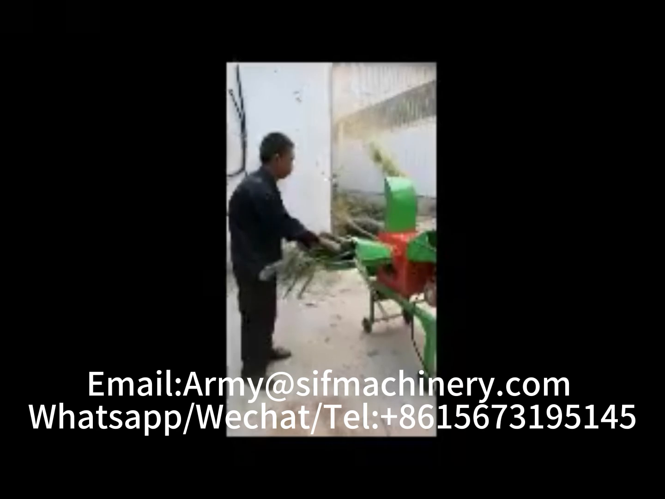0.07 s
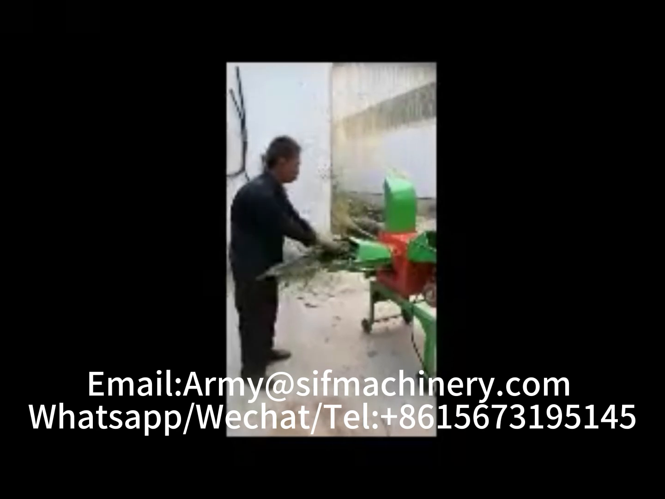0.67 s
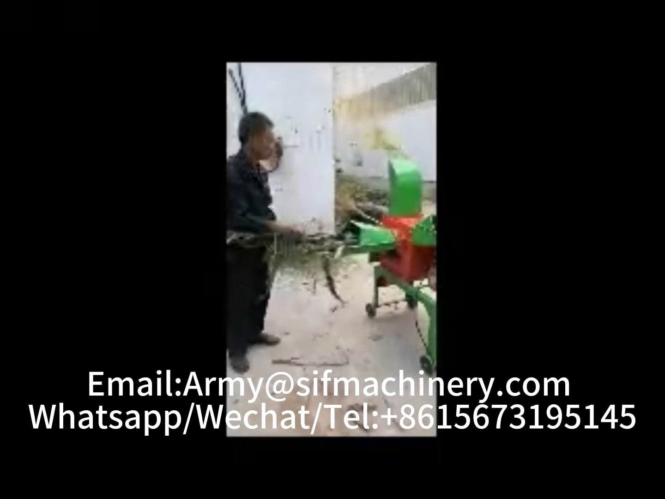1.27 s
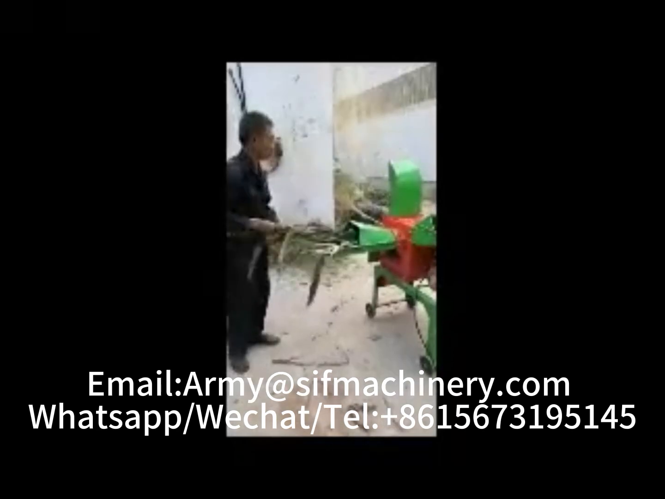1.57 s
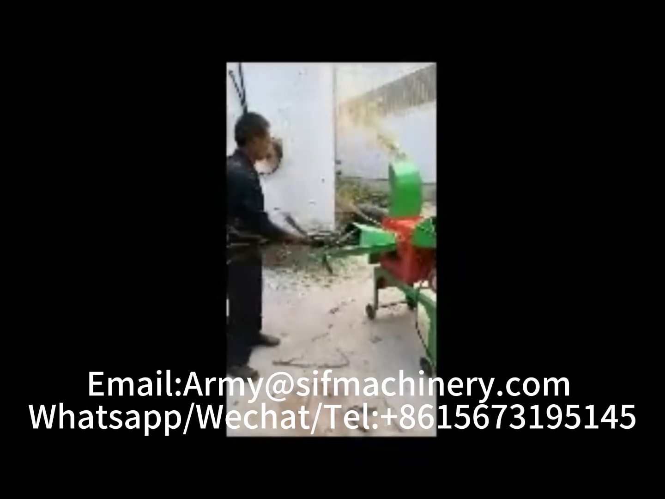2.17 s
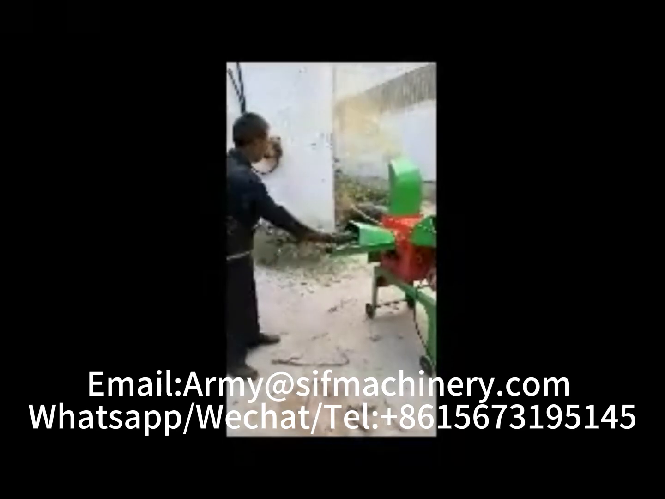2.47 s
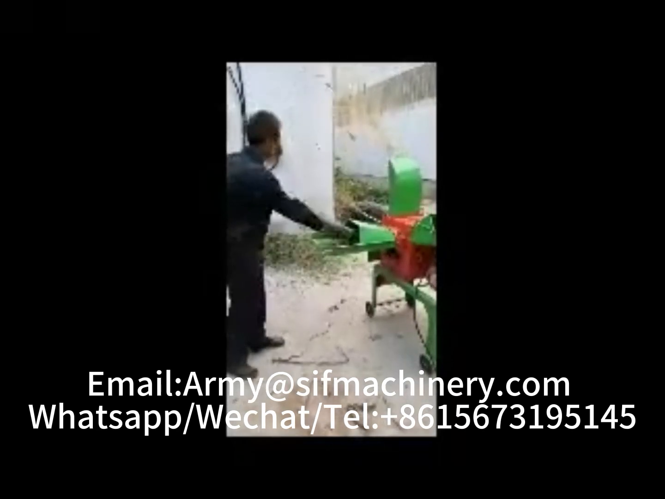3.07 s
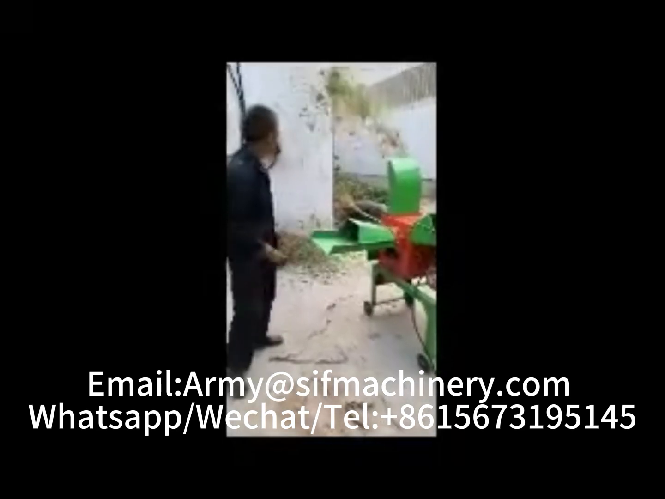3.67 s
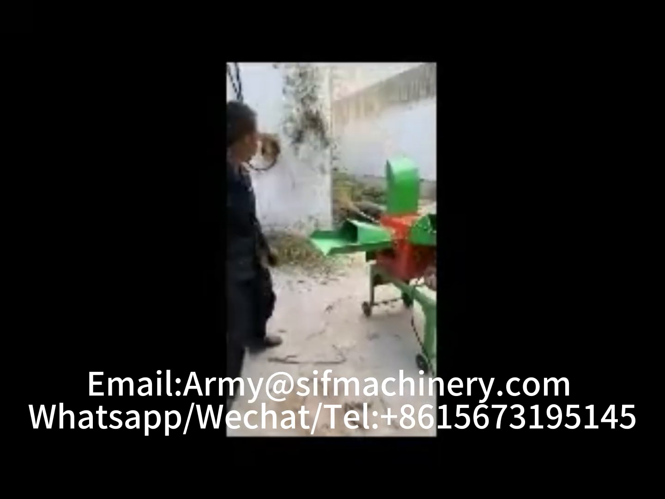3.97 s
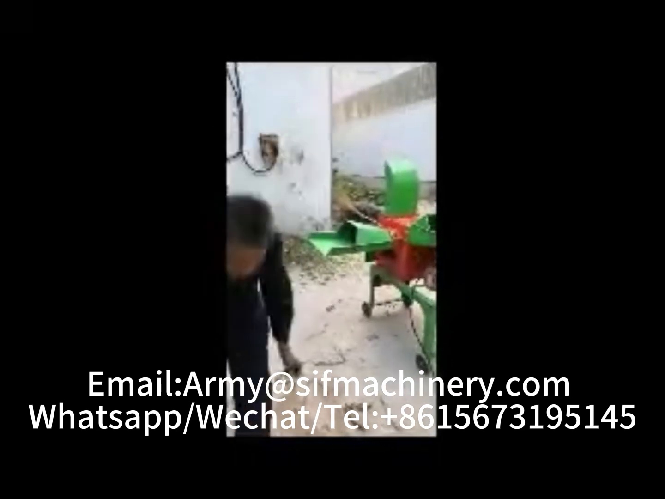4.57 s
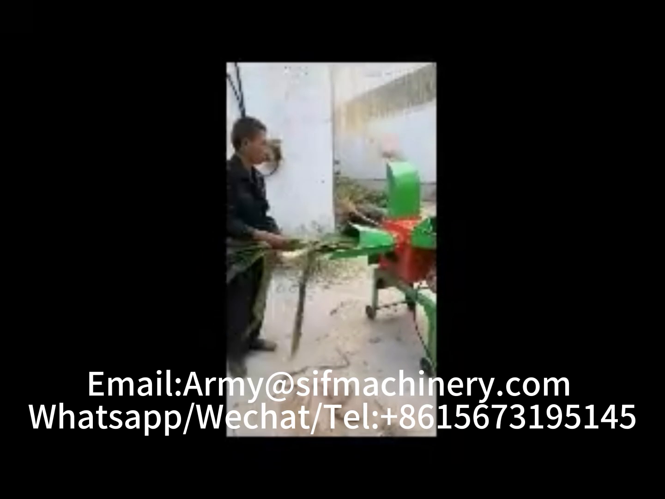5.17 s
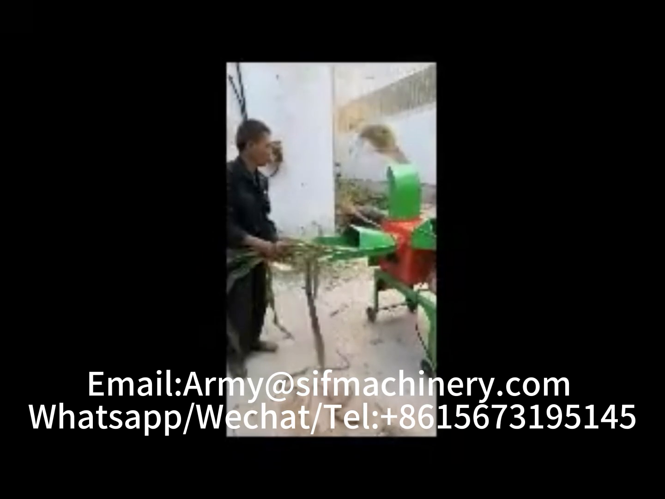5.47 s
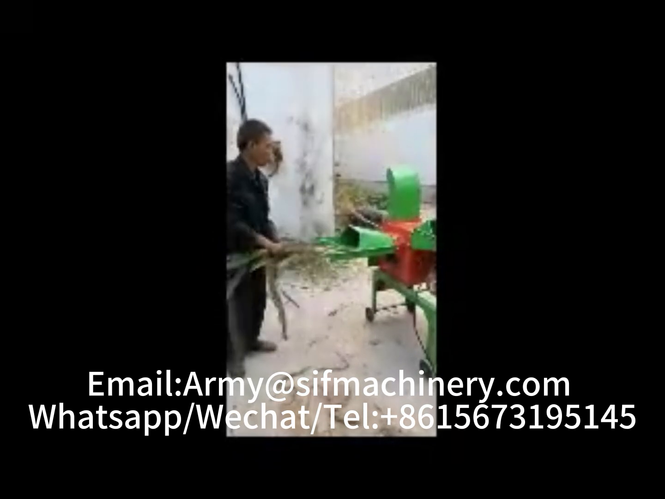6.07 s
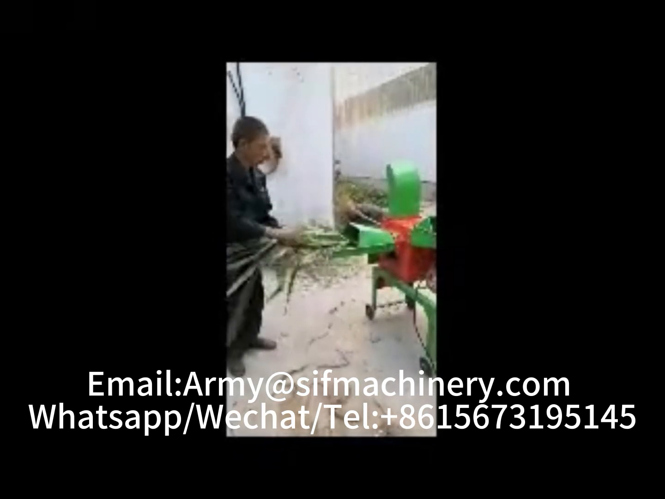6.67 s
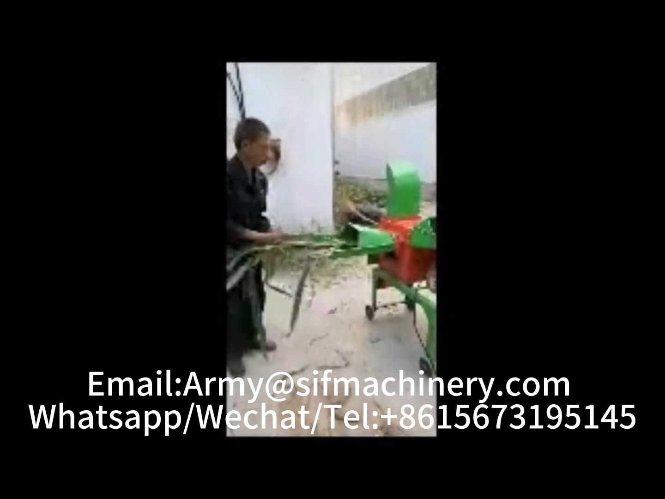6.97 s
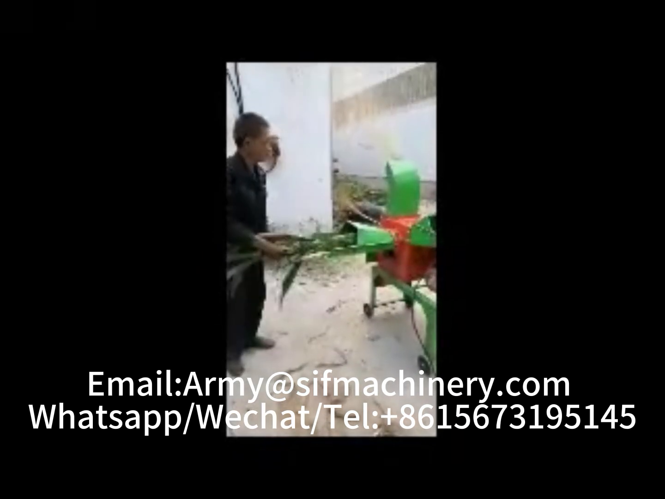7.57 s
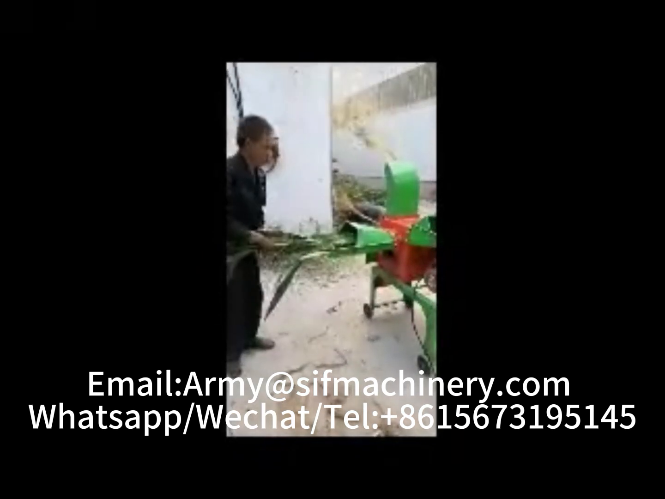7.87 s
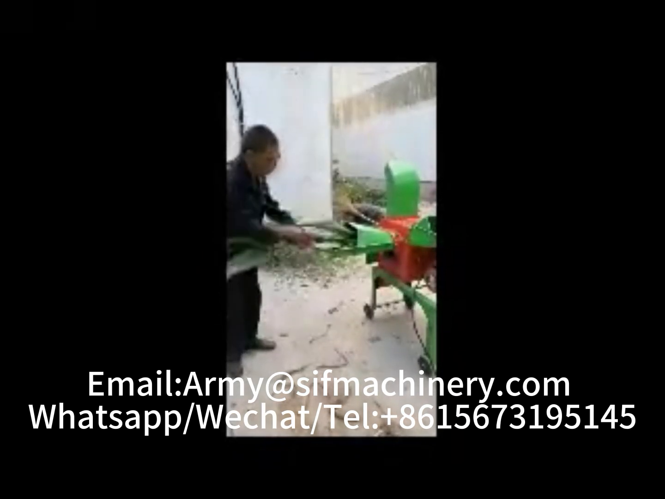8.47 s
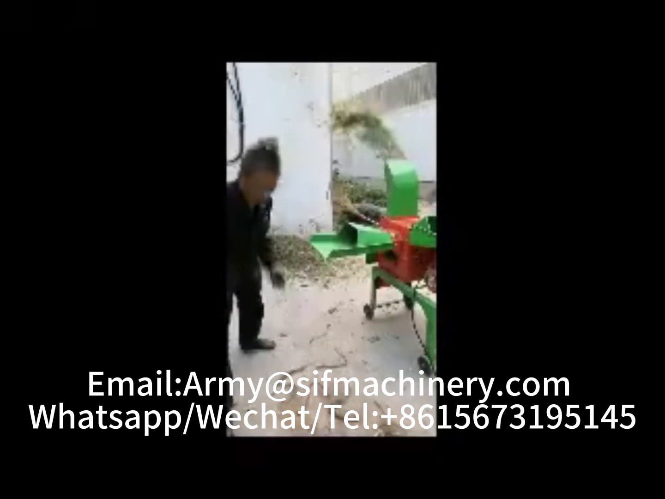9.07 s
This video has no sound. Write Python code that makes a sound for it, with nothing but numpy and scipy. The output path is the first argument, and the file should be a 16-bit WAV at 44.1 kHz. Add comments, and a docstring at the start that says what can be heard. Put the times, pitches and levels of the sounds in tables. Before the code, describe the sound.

A chopping machine runs with a throbbing hum and rattling roar, tearing through bundles of stalks with scrapes and snaps.

```python
"""Chaff cutter in a yard

A belt-driven chaff cutter runs in a walled yard, a little to the right, as bundles of stalks go in.
Its three-knife rotor hums, throbs against the feed drive and blows a rattling roar. Each bundle slows
the rotor and drowns the hum in harsh shredding. Stalks squeal along the sheet-metal chute and a few
snap; there are two dull bumps, and the labouring drive gives a thin whine."""
import sys
import numpy as np
from scipy import signal
from scipy.fft import rfft, irfft, next_fast_len
from scipy.io import wavfile
from scipy.ndimage import uniform_filter1d

SR = 44100
rng = np.random.default_rng(int(sys.argv[2]) if len(sys.argv) > 2 else 0)


def persist_wave(psi):
    """Save psi, clipped to +-1, as 16-bit WAV."""
    counts = np.round(np.clip(psi, -1, 1) * 32767).astype(np.int16)
    wavfile.write(sys.argv[1], SR, np.atleast_2d(counts).T)


N = 411012
T = np.arange(N) / SR
HZ = np.fft.rfftfreq(1024, 1 / SR)


def gain_of(db):
    return 10 ** (np.asarray(db) / 20)


def unit_level(sound):
    return sound / np.sqrt(np.mean(sound ** 2) + 1e-20)


def over_time(points):
    """Joins (time_s, value) points into a value for every sample."""
    return np.interp(T, *np.transpose(points))


def over_pitch(points):
    """Joins (pitch_hz, value) points into a value for every pitch in HZ."""
    hz, value = np.transpose(points)
    return np.interp(np.log(HZ + 1), np.log(hz + 1), value)


def resonance(hz, width_hz):
    """A tone colour with one narrow peak, in dB."""
    return -20 * np.log10(1 + ((HZ - hz) / width_hz) ** 2)


def wander(rate_hz):
    """A smooth random drift, about 1 in size."""
    hz = np.fft.rfftfreq(4096, T[-1] / 4096)
    drift = irfft(rfft(rng.standard_normal(4096)) * np.exp(-(hz / rate_hz) ** 2))
    return np.interp(T, np.linspace(0, T[-1], 4096), unit_level(drift))


def add(mix, start_s, sound):
    part = mix[..., max(round(start_s * SR), 0):][..., :sound.shape[-1]]
    part += sound[..., :part.shape[-1]]


# How alike the left and right sides sound: pitch_hz, likeness (0 to 1)
STEREO_LIKENESS = [(200, 0.82), (330, 0.7), (550, 0.053), (1200, 0.48), (2500, 0.29), (9000, 0.18)]

def radiate(noises, colour_db, balance, flicker_db, left_lead_s=0.00013):
    """Gives two unrelated noises a flickering tone colour and spreads them from left to right."""
    first, second = signal.stft(noises, nperseg=1024, noverlap=768)[2]
    flicker = uniform_filter1d(rng.standard_normal(first.shape), size=7, axis=0)
    flicker = unit_level(uniform_filter1d(flicker, size=14, axis=1))
    colour = gain_of(colour_db[:, None] + flicker_db * np.tanh(flicker))
    likeness = over_pitch(STEREO_LIKENESS)[:, None]
    left = likeness * first + np.sqrt(1 - likeness ** 2) * second
    left = left * np.exp(2j * np.pi * HZ * left_lead_s)[:, None]
    lean = gain_of(over_pitch(balance) / 2)[:, None]
    spectra = np.array([left * lean, first / lean]) * colour
    stereo = signal.istft(spectra, nperseg=1024, noverlap=768)[1][:, :N]
    return stereo / np.sqrt(np.mean(stereo.mean(0) ** 2))


def crackle(per_s, spread_db, share):
    """Two streams of tiny cracks in a bed of hiss; share is the cracks' part of the power."""
    sizes = gain_of(spread_db * np.minimum(rng.exponential(1, N), 4))
    cracks = sizes * (rng.random(N) < per_s / SR)
    grains = unit_level(uniform_filter1d(cracks ** 2, size=24).clip(0) ** .5)
    return rng.standard_normal((2, N)) * np.sqrt(share * grains ** 2 + 1 - share)


def repeat_each_turn(turns, noise, share, steps=600):
    """The same parts knock at the same angles, so a share of the rattle comes back every turn."""
    patterns = rng.standard_normal((2, steps))
    loop = np.array([np.interp(turns % 1 * steps, np.arange(steps), side) for side in patterns])
    return np.sqrt(share) * unit_level(loop) + np.sqrt(1 - share) * noise


def strokes(turns, knife_db, turn_db, uneven_db, knives=3):
    """Every passing knife gives a surge; one bites deeper than the others."""
    angle = 2 * np.pi * turns
    surge_db = knife_db * np.sin(knives * angle) + turn_db * np.sin(angle) + uneven_db * wander(37)
    return unit_level(gain_of(surge_db))


def grip(start_s, length_s, attack_s, release_s):
    """One bite builds up from 0 to 1, holds and lets go."""
    return np.clip(np.minimum((T - start_s) / attack_s, 1 - (T - start_s - length_s) / release_s), 0, 1)


# The knives bite into clumps of stalks:
# start_s, length_s, slice_db, batter_db, hum_drop_db, brake_hz_per_s
BITES = [(0.305, 0.25, -34, -29, -3, 0), (0.64, 0.08, -26.5, -22, 0.5, 0),
         (0.735, 0.29, -23.5, -21, 8, 11.5), (1.117, 0.12, -31, -46.5, 2, 2),
         (1.243, 0.047, -26.5, -44, 3.5, 2), (1.503, 0.084, -23, -26, 3.5, 11),
         (1.651, 0.11, -22.5, -25.5, 9, 5.5), (1.765, 0.13, -22.5, -18, 15, 16),
         (1.887, 0.21, -28, -30.5, 5, 8.5), (2.447, 0.16, -23.5, -21.5, 10, 6.5),
         (2.61, 0.18, -28.5, -32, 4.5, 1.5), (2.89, 0.063, -24, -24.5, 15, 5.5),
         (2.969, 0.22, -23, -20, 15, 13.5), (3.187, 0.24, -27, -27, 4, 11),
         (3.381, 0.09, -26.5, -37.5, 8, 5), (3.603, 0.057, -31.5, -43, 0.5, 0),
         (5.1, 0.12, -22.5, -19.5, 14, 35), (5.207, 0.2, -25, -23.5, 14, 27.5),
         (5.397, 0.29, -32, -29.5, 6.5, 3.5), (5.726, 0.315, -23.5, -27, 9.5, 2.5),
         (6.23, 0.09, -33, -34, 0.5, 0), (6.403, 0.055, -27.5, -31, 1, 0), (6.464, 0.21, -22, -23, 7.5, 2),
         (6.698, 0.16, -32.5, -49, 4, 0.26), (7.022, 0.088, -29, -30.5, 0, 0),
         (7.119, 0.122, -22, -24, 13.5, 6.5), (7.27, 0.11, -25.5, -25.5, 14, 6),
         (7.388, 0.12, -22, -25, 12.5, 8), (7.525, 0.22, -26, -42, 5.5, 1.6),
         (7.774, 0.34, -28.5, -30.5, 2.5, 1.35), (8.085, 0.15, -23, -30, 9, 2.5),
         (8.265, 0.11, -24.5, -31.5, 8, 9), (8.376, 0.21, -23, -21, 13.5, 4.5),
         (8.603, 0.11, -22, -18.5, 16, 17.5), (8.72, 0.13, -22.5, -22, 8.5, 21.5),
         (8.849, 0.2, -28, -29, 8.5, 6.5)]

def feed():
    """Adds up how hard the bites slice, batter the housing, choke the hum and drag on the rotor."""
    slice_power, batter_power, choke_db, drag = np.zeros((4, N))
    for start_s, length_s, slice_db, batter_db, hum_drop_db, brake_hz_per_s in BITES:
        slice_power += gain_of(slice_db) ** 2 * grip(start_s, length_s, attack_s=.023, release_s=.06)
        batter_power += gain_of(batter_db) ** 2 * grip(start_s, length_s, attack_s=.052, release_s=.057)
        load = grip(start_s, length_s, attack_s=.08, release_s=.07)
        choke_db += hum_drop_db * load
        drag += brake_hz_per_s * load
    return np.sqrt(slice_power), np.sqrt(batter_power), choke_db, drag


def rotor_speed(drag, idle_hz=52.596, opening_hz=49.832, recover_s=.529):
    """Turns per second: stalks brake the heavy rotor and the belt pulls it back up to speed."""
    sag_hz = signal.lfilter([1 / SR], [1, -np.exp(-1 / (SR * recover_s))], drag)
    return idle_hz - sag_hz - (idle_hz - opening_hz) * np.exp(-T / recover_s)


def shaft_tones(turns, tones, waver_db, slip, lag):
    """Wavering tones that follow the rotor's speed; the housing delays the higher ones."""
    out = np.zeros(N)
    for per_turn, level_db in tones:
        strength = gain_of(level_db + waver_db * wander(6.4))
        phase = 2 * np.pi * per_turn * turns - lag * per_turn ** 2 + slip * per_turn * wander(12)
        out += strength * np.cos(phase)
    return out


# The tones of the rotor, the feed drive and the struck housing: cycles_per_turn, level_db
ROTOR_TONES = [(1, -24.5), (2, -7), (3, -1.5), (4, -3.5), (5, -15), (6, -14.5), (7, -19.5), (8, -26),
               (9, -31.5), (11, -32), (12, -26.5), (15, -30), (18, -30), (21, -24.5)]
DRIVE_TONES = [(1.566, -27), (2.563, -36), (3.565, 1), (4.565, -15.5)]
HOUSING_TONES = [(6, -8), (7, -11), (9, -23.5), (15, -15), (18, -17.5), (21, -23)]
# How the feed drive swells and fades against the rotor: time_s, level_db
DRIVE_LEVELS = [(.35, -13), (.9, -6.5), (1.2, -6.5), (1.6, -15), (2.35, -4.5), (2.85, -3.5), (3.45, -17.5),
                (4.05, -5), (5., -12), (5.6, -27.5), (6.25, -3), (7., -5.5), (8.2, -20), (8.5, -4.5),
                (8.9, -17.5), (9.3, -16)]

def hum(turns, choke_db, battering):
    """Rotor and feed drive throb against each other; stalks choke them and knife blows add a growl."""
    rotor = gain_of(-2.5) * shaft_tones(turns, ROTOR_TONES, waver_db=1.2, slip=.0045, lag=.75)
    drive_gain = gain_of(over_time(DRIVE_LEVELS) + 1)
    drive = drive_gain * shaft_tones(turns, DRIVE_TONES, waver_db=2.76, slip=.007, lag=.442)
    growl = gain_of(-.5) * battering * shaft_tones(turns, HOUSING_TONES, waver_db=2.5, slip=.025, lag=.3)
    return gain_of(-16 - choke_db) * (rotor + drive) / np.sqrt(1 + drive_gain ** 2) + growl


def throb(drone):
    """The beats of a drone: its loudness right now divided by its recent average."""
    envelope = abs(signal.hilbert(drone, next_fast_len(N))[:N])
    quick, slow = uniform_filter1d(envelope, size=500), uniform_filter1d(envelope, size=4000)
    return np.clip(quick / (slow + 1e-9), .05, 3)


# The tone colours of the churned air and the rattling frame: pitch_hz, level_db
AIR_COLOUR = [(20, -21.5), (60, -23), (110, -8.5), (180, 5), (235, -10.5), (320, 3.5), (400, -7),
              (500, -17), (700, -41), (1500, -64)]
RATTLE_COLOUR = [(280, -23.5), (480, -6.5), (671, -2.5), (788, -1), (1010, -0.5), (1310, -7), (1660, 1.5),
                 (2020, -4.5), (2380, 0.5), (3160, -9.5), (5810, -8.5), (8530, -15.5), (9300, -50),
                 (12100, -64.5), (20500, -120)]
# Which side the machine is louder on: pitch_hz, left_minus_right_db
MACHINE_BALANCE = [(60, -0.5), (140, 3), (320, -1), (740, -3.5), (1720, -4.5), (3970, -8.5), (9190, -3.5)]

def roar(turns, beats, choke_db):
    """Air churned in the drum chuffs with the beats of the hum; the frame rattles along."""
    air = rng.standard_normal((2, N)) * strokes(turns, knife_db=6, turn_db=3, uneven_db=3) * beats ** .43
    air = radiate(air, over_pitch(AIR_COLOUR), MACHINE_BALANCE, flicker_db=.6)
    rattle = repeat_each_turn(turns, crackle(per_s=1900, spread_db=2, share=.19), share=.083)
    rattle *= strokes(turns, knife_db=.4, turn_db=-.5, uneven_db=.6)
    rattle = radiate(rattle, over_pitch(RATTLE_COLOUR), MACHINE_BALANCE, flicker_db=3.5)
    return gain_of(-27 - .64 * choke_db) * air + gain_of(-26.5 - .65 * choke_db) * rattle


# The tone colours of stalks being sliced and of pieces hitting the housing: pitch_hz, level_db
SLICE_COLOUR = [(1650, -18), (2800, 2.5), (2900, -8.5), (3270, 1), (3570, -5), (3960, 1), (4640, -2),
                (5090, -1), (5760, 0.5), (6450, -5.5), (7650, 0.5), (8140, -7), (9600, -28), (12500, -60),
                (21100, -120)]
BATTER_COLOUR = [(140, -42), (230, -39.5), (299, 2.5), (355, -15.5), (384, -5), (457, -9), (532, -22),
                 (690, -5.5), (967, -6), (1040, 1.5), (1280, -9.5), (1670, 2.5), (1940, -3), (2340, 0),
                 (3100, -7), (4030, -31), (6820, -120)]
# Which side the cutting is louder on: pitch_hz, left_minus_right_db
CUTTING_BALANCE = [(300, -9), (1000, -3.5), (3000, -5.5), (5200, -10), (7000, -4), (9000, 1)]

def cutting(turns, slicing, battering):
    """Knives shred the stalks stroke by stroke and fling the pieces against the housing."""
    slices = crackle(per_s=2900, spread_db=0, share=.36)
    slices *= strokes(turns, knife_db=1.5, turn_db=.2, uneven_db=1.15)
    slices = radiate(slices, over_pitch(SLICE_COLOUR), CUTTING_BALANCE, flicker_db=4)
    hits = repeat_each_turn(turns, crackle(per_s=890, spread_db=2, share=.23), share=.17)
    hits *= strokes(turns, knife_db=1.7, turn_db=-1.15, uneven_db=.04)
    hits = radiate(hits, over_pitch(BATTER_COLOUR), CUTTING_BALANCE, flicker_db=3.5)
    return gain_of(1.28) * slicing * slices + gain_of(.57) * battering * hits


# Stalks squealing along the chute: middle_s, length_s, pitch_hz, width_hz, level_db
SCRAPES = [(0.858, 0.85, 4330, 300, -32), (1.053, 1, 7370, 348, -34), (1.353, 0.5, 4180, 220, -35.5),
           (1.367, 0.27, 5970, 350, -36), (2.149, 0.54, 1780, 200, -30.5),
           (2.259, 0.33, 2521, 89.83, -27.5), (2.496, 0.84, 4050, 286, -31.5),
           (2.797, 0.72, 1780, 120, -37.5), (3.418, 0.42, 4022, 248, -38), (5.852, 0.43, 4200, 180, -32.5),
           (5.885, 0.41, 6970, 251, -32), (6.58, 0.34, 2767, 48.6, -33), (7.322, 0.13, 2762, 59.9, -27.5),
           (7.346, .35, 1049, 130, -32), (7.736, 0.23, 4842, 350, -30.5), (7.937, 0.2, 1717, 45, -26),
           (8.13, 0.38, 1890, 140, -28.5)]

def scrapes(turns):
    """Stalks rub the sheet metal and make it ring, chattering once every rotor turn."""
    out = np.zeros((2, N))
    chatter = strokes(turns, knife_db=1, turn_db=6.5, uneven_db=1)
    for middle_s, length_s, pitch_hz, width_hz, level_db in SCRAPES:
        count = round(length_s * SR)
        colour = gain_of(np.interp(np.fft.rfftfreq(count, 1 / SR), HZ, resonance(pitch_hz, width_hz)))
        squeal = unit_level(irfft(rfft(rng.standard_normal((2, count))) * colour, count))
        swell = np.sin(np.linspace(0, np.pi, count))
        add(out, middle_s - length_s / 2, gain_of(level_db) * squeal * swell)
    return out * chatter * gain_of([[-2], [5]])  # louder on the right


# Single stalks breaking: start_s, level_db, pitch_hz
SNAPS = [(1.28, -13, 6860), (3.659, -18, 3330), (4.689, -18, 5653), (5.597, -16, 7560), (7.449, -12, 5066),
         (8.612, -20, 5010)]

def snaps(ring_s=.06, width_hz=600, count=8192):
    """A stalk snaps with a hard, bright crack that dies away at once."""
    out = np.zeros((2, N))
    t, hz = T[:count], np.fft.rfftfreq(count, 1 / SR)
    for start_s, level_db, pitch_hz in SNAPS:
        colour = 1 / (1 + ((hz - pitch_hz) / width_hz) ** 2)
        crack = irfft(rfft(rng.standard_normal((2, count))) * colour) * gain_of(-60 * t / ring_s)
        add(out, start_s, gain_of(level_db) * crack / abs(crack).max())
    return out * gain_of([[-3], [3]])  # louder on the right


# Dull bumps: peak_s, level_db
BUMPS = [(4.97, -37.5), (7.91, -38)]

def bumps(rise_s=.02, cutoff_hz=110, count=8192):
    """Each bump is a burst of deep noise that swells quickly and fades."""
    out = np.zeros((2, N))
    t, hz = T[:count], np.fft.rfftfreq(count, 1 / SR)
    swell = t / rise_s * np.exp(1 - t / rise_s)
    for peak_s, level_db in BUMPS:
        thud = unit_level(irfft(rfft(rng.standard_normal(count)) / (1 + (hz / cutoff_hz) ** 4)))
        add(out, peak_s - rise_s, gain_of(level_db) * thud * swell)
    return out


# How loud the labouring drive whines: time_s, level_db
WHINE_LEVELS = [(5.4, -68.5), (5.55, -42), (5.67, -28.5), (5.9, -36), (6.2, -67.5), (8.75, -65), (9., -34),
                (9.3, -37.5)]

def whine(pitch_hz=7745, width_hz=60):
    """The labouring drive gives a fuzzy, high whine that swells twice."""
    noises = rng.standard_normal((2, N))
    tone = radiate(noises, resonance(pitch_hz, width_hz), MACHINE_BALANCE, flicker_db=3.5)
    return gain_of(over_time(WHINE_LEVELS)) * tone


def scene():
    """The bites slow the rotor, and its turning sets the pace of the hum, roar, cutting and scrapes."""
    slicing, battering, choke_db, drag = feed()
    turns = np.cumsum(rotor_speed(drag)) / SR
    drone = hum(turns, choke_db, battering)
    machine = drone + roar(turns, throb(drone), choke_db)
    return machine + cutting(turns, slicing, battering) + scrapes(turns) + snaps() + bumps() + whine()


def record(dry, start_s=.345, fade_s=.002, ceiling=.92, cutoff_hz=9600):
    """Starts the sound abruptly, rounds off its tallest peaks and removes the highest treble."""
    opened = dry * np.clip((T - start_s) / fade_s, 0, 1)
    rounded = opened / (1 + (opened / ceiling) ** 8) ** (1 / 8)
    lowpass = signal.firwin(511, cutoff_hz, window=("kaiser", 10), fs=SR)
    return signal.oaconvolve(rounded, lowpass[None], "same")


dry = scene()
out = record(dry)
persist_wave(out)
```